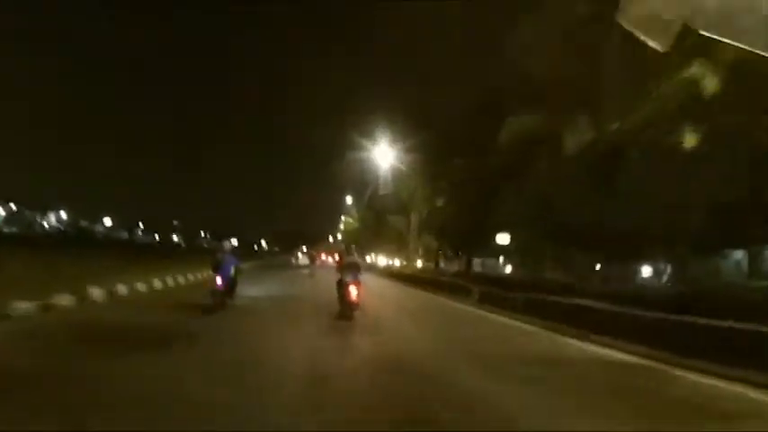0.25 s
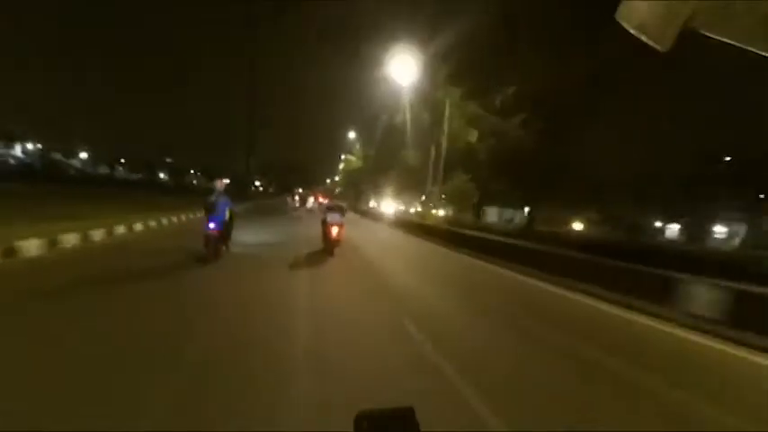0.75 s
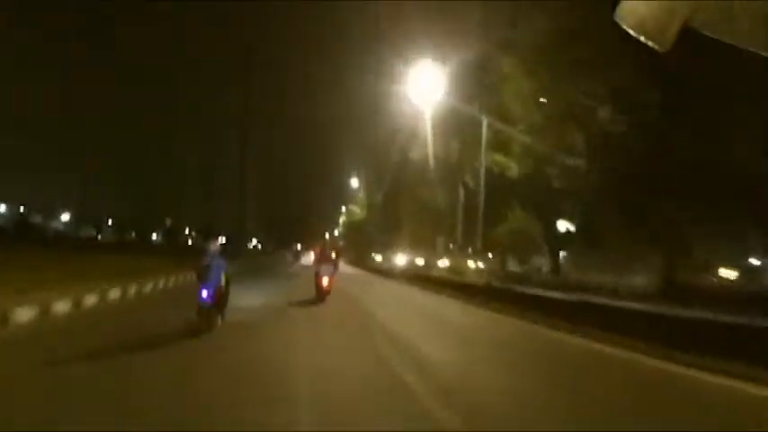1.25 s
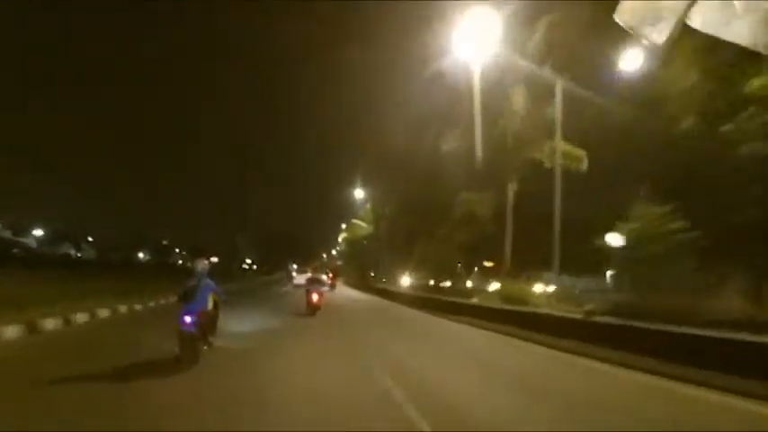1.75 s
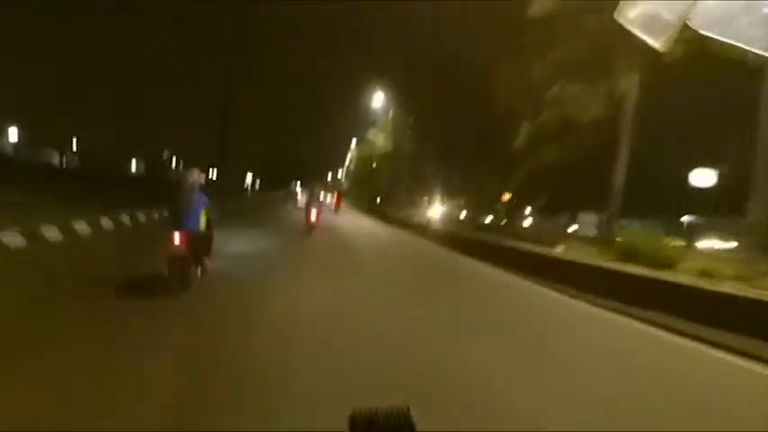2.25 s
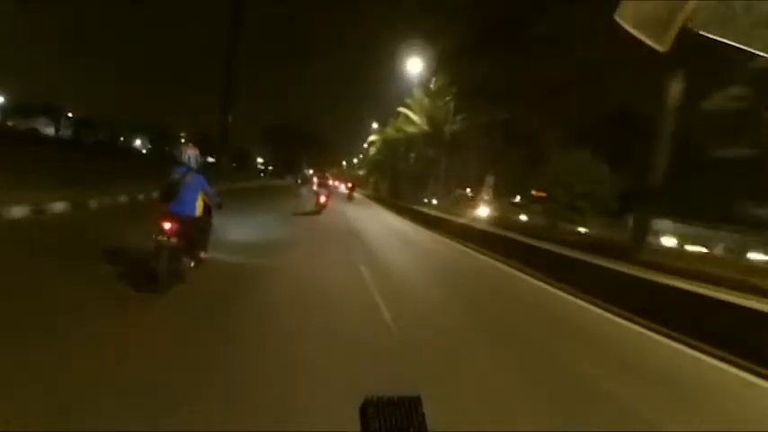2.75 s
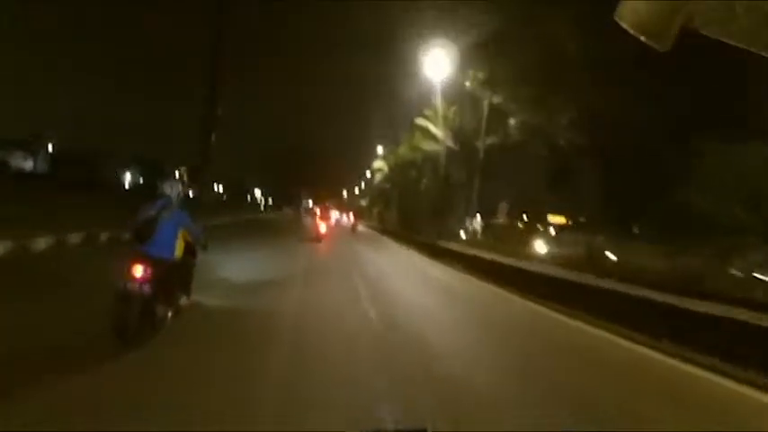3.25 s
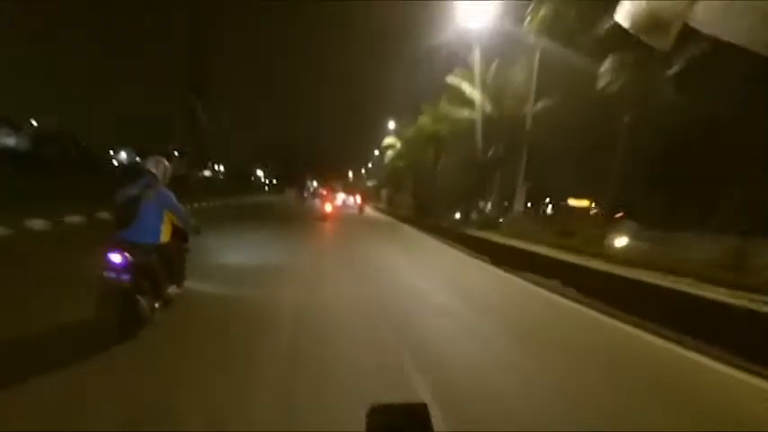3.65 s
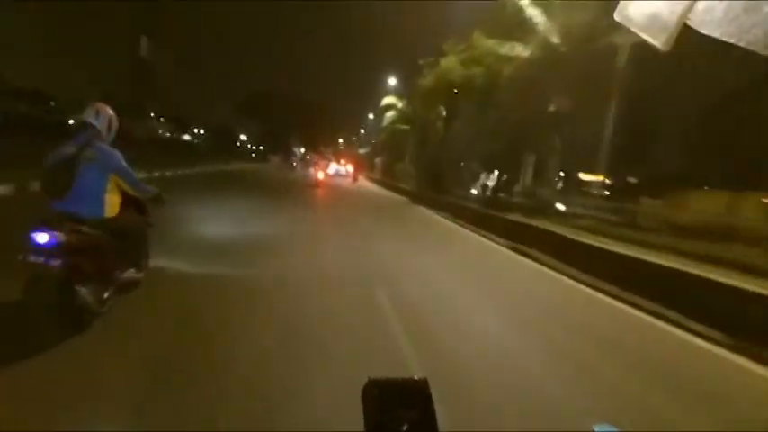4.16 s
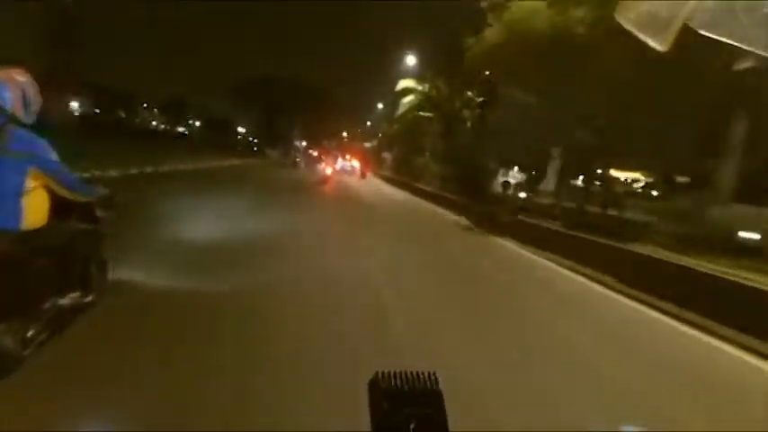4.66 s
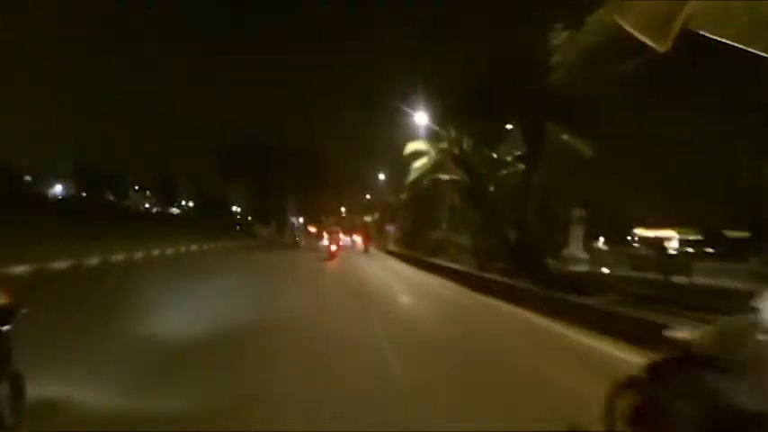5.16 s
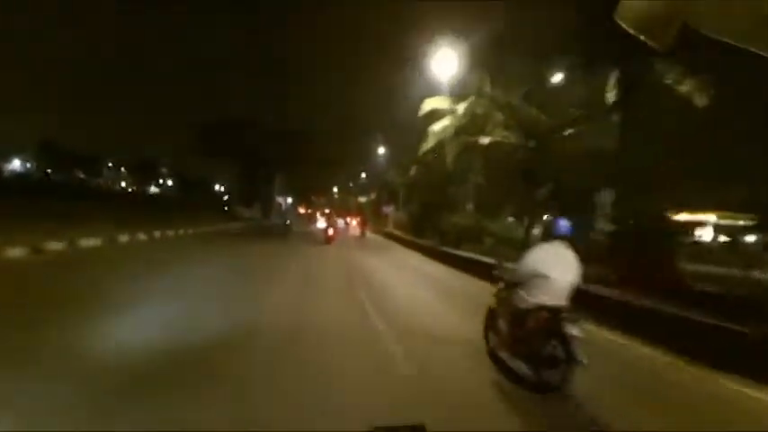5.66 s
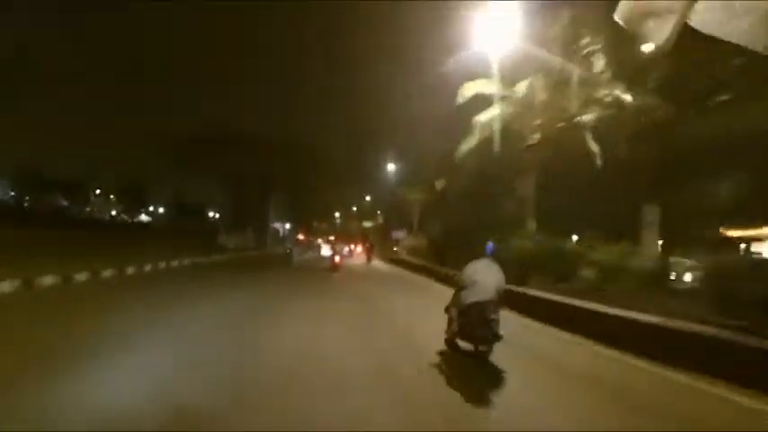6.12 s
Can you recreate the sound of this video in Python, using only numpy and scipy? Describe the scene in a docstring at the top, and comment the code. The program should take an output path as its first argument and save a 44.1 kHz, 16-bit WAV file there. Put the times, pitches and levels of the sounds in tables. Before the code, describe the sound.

Strong wind buffets a microphone on a motorcycle cruising along a city road, making a deep rumble with irregular thumps and fluttering. Underneath, the small engine drones and putters at a steady speed, with faint gear whine and tyre hiss. Light metallic ticking comes through in the second half. Near five seconds two scooters run close alongside, and the road noise swells and brightens a little.

```python
"""Wind buffets the microphone in heavy lumps: a small single-cylinder motorcycle cruising a city at night.
Big eddies thump the diaphragm and shed smaller ones that flutter and tear. Underneath, each firing puffs
through the silencer as a drone and putter, the valves tick, the gears whine and the tyres hiss on asphalt.
Near five seconds two scooters run close alongside, and the road noise swells and brightens."""
import sys
import numpy as np
from scipy import signal
from scipy.fft import rfft, irfft, next_fast_len
from scipy.io import wavfile
from scipy.ndimage import uniform_filter1d, map_coordinates

SR = 44100
rng = np.random.default_rng(int(sys.argv[2]) if len(sys.argv) > 2 else 0)


def unload_audio(sound):
    """Save the sound as a 16-bit wav file, at the path given as the first command line argument."""
    columns = np.transpose(np.atleast_2d(sound))
    # keep every value between -1 and 1, then stretch to whole-number steps
    steps = np.round(np.clip(columns, -1, 1) * 32767)
    wavfile.write(sys.argv[1], SR, steps.astype(np.int16))


N = 281799

# The bed of wind. Each row: time in seconds, then base levels of rumble, eddies and tearing in dB.
AIRFLOW_LEVELS = [(0, -25.5, -35.5, -43.5), (0.5, -29, -33, -41.5), (1.0, -25.5, -33, -42.5),
                  (1.6, -25.5, -36.5, -45.5), (1.9, -22.5, -30.5, -42.5), (2.45, -24.5, -30.5, -42.5),
                  (3.0, -23.5, -29, -43), (3.65, -20, -30.5, -44), (4.04, -21.5, -25.5, -50),
                  (4.3, -23.5, -29, -50), (4.5, -14.5, -24, -45), (4.8, -22.5, -27, -53),
                  (5.12, -24.5, -30, -58), (5.3, -24, -30, -50), (5.9, -21.5, -32, -48),
                  (6.39, -21, -31.5, -42.5)]
# Gust hits. Each row: centre and half-length in seconds, then thump, eddies and tearing in dB.
GUST_HITS = [(0.055, 0.02, -24, -39, -45), (0.227, 0.017, -13, -37, -41),
             (0.273, 0.037, -12.5, -25.5, -34.5), (0.368, 0.018, -21.5, -34, -36),
             (0.71, 0.024, -13.5, -25, -43), (0.784, 0.016, -25, -44, -39), (0.898, 0.01, -17.5, -30, -54),
             (1.04, 0.02, -28, -34, -36), (1.212, 0.0079, -31, -24, -60), (1.422, 0.037, -21, -48, -44),
             (1.75, 0.036, -24.5, -42, -57), (1.928, 0.036, -19, -33, -55),
             (2.043, 0.023, -14, -27.5, -39.5), (2.231, 0.024, -10, -24, -37),
             (2.61, 0.029, -21.5, -45, -55), (2.707, 0.017, -8.5, -31, -33), (2.898, 0.02, -16.5, -34, -46),
             (3.044, 0.026, -19.5, -30, -43), (3.22, 0.014, -26, -35, -55), (3.393, 0.02, -25, -35, -59),
             (3.452, 0.014, -17, -20.5, -52), (3.493, 0.022, -13.5, -33, -56),
             (3.663, 0.013, -10, -43, -40), (3.782, 0.011, -20, -34, -57), (3.866, 0.026, -19.5, -35, -52),
             (3.941, 0.019, -8.5, -22, -43), (3.993, 0.016, -12.5, -21, -30), (4.121, 0.025, -12, -34, -54),
             (4.159, 0.015, -26, -22.5, -40), (4.567, 0.024, -27, -37, -38), (4.624, 0.013, -15, -34, -49),
             (4.693, 0.017, -17.5, -24, -52), (4.995, 0.02, -16.5, -26, -54),
             (5.444, 0.012, -14.5, -26, -48), (5.545, 0.0095, -11, -42, -55),
             (5.73, 0.018, -19.5, -30.5, -47), (5.96, 0.017, -17, -27, -42), (6.051, 0.016, -12, -31, -53),
             (6.079, 0.023, -19, -25, -34), (6.262, 0.015, -14, -30.5, -43),
             (6.377, 0.026, -22, -41, -35.5)]
# The airflow slackens. Each row: centre and half-length in seconds, drop of the rumble in dB.
WIND_LULLS = [(0.13, 0.037, 0.5), (0.97, 0.012, 6), (1.996, .014, 14), (2.305, 0.018, 4), (2.53, 0.018, 3),
              (2.425, 0.024, 6), (2.665, 0.018, 8), (2.826, .025, 4), (3.298, 0.016, 6), (3.6, 0.03, 7),
              (3.73, 0.017, 6.5), (4.21, 0.014, 4), (4.388, 0.02, 4), (5.16, 0.05, 10.5),
              (5.667, 0.033, 4.5), (5.862, 0.025, 12.5), (6.166, 0.024, 7)]
# Wind colours, deepest first. Each row: frequency in Hz, relative level in dB.
SWAY_EQ = [(3, -17), (9, -4.5), (15, 2.5), (20, -7.5), (30, -20.5), (100, -69.5), (1000, -120)]
RUMBLE_EQ = [(8, -28.5), (17, -3), (23, 0), (33, -1.5), (48, -6.5), (70, -8.5), (100, -13), (150, -27),
             (260, -35.5), (500, -84), (3000, -120)]
THUMP_EQ = [(10, -17), (22, -1), (35, 1.5), (55, -3), (75, -8), (100, -20), (150, -27.5), (260, -39.5),
            (500, -78), (3000, -120)]
EDDY_EQ = [(50, -28.5), (100, 2.5), (150, 1), (210, -3), (290, -11), (390, -19), (600, -27.5), (900, -36.5),
           (1300, -37.5), (2500, -51.5), (6000, -54.5), (14000, -110)]
TEAR_EQ = [(120, -16.5), (250, 8), (340, 6.5), (500, -3.5), (800, -11.5), (1600, -28), (3000, -64),
           (12000, -106)]

# Engine speed. Each row: time in seconds, firings per second.
FIRING_RATE = [(0.0, 43.92), (1.2, 44.17), (2.2, 44.22), (4.0, 44.69), (5.0, 44.8), (6.39, 44.68)]
# Engine faders. Each row: time in seconds, then drone, putter (before its trim) and valve ticks in dB.
ENGINE_LEVELS = [(0, -41, -49, -74), (1, -44, -46, -75), (2, -42, -47, -68), (3.65, -37.5, -45.5, -59),
                 (4.4, -38, -44.5, -59.5), (5.1, -37, -38, -53.5), (5.6, -38.5, -35.8, -54.5),
                 (5.8, -39.5, -37, -58), (6, -40.5, -40, -61), (6.39, -44.5, -44, -63)]
# Low exhaust harmonics. Each row: multiple of the firing rate, relative level in dB.
DRONE_HARMONICS = [(3, 3), (4, -7.5), (5, 2), (6, 1.5), (7, 0), (8, -9)]
# The exhaust pipe's mellow voice and its sharp bark. Each row: frequency in Hz, relative level in dB.
MELLOW_EQ = [(150, -50.5), (350, -3), (400, -7.5), (445, 1), (490, 2.5), (540, 4.5), (585, 3.5),
             (630, -1.5), (680, -2.5), (730, -13.5), (810, -34), (900, -14), (1200, -36), (3000, -34),
             (12000, -103)]
BARK_EQ = [(150, -22), (380, -38.5), (490, 2), (580, 3.5), (630, 2.5), (680, 5.5), (730, 2), (810, -11.5),
           (900, -12), (1200, -13), (1700, -24), (3000, -22), (12000, -105)]
# Crossfade between those voices. Each row: time in seconds, share of bark from 0 to 1.
BARK_BLEND = [(0, 0.1), (4.2, 0.05), (4.9, 0.45), (5.5, 0.29), (6, 0.76), (6.39, 0.7)]
# Colour of the valve ticks. Each row: frequency in Hz, relative level in dB.
TICK_EQ = [(2500, -30), (4500, -6), (5000, -6), (5700, -6), (6400, -6.5), (7600, -3.5), (8500, -6.5),
           (11000, -11.5), (15000, -34)]
# Metallic rasp after each tick. Each row: time in seconds, level in dB, ring pitch in Hz.
VALVE_RASP = [(0, -78, 6400), (2.3, -80, 6550), (2.9, -60, 7070), (3.6, -65, 7180), (3.85, -61, 6450),
              (4.35, -59, 6400), (4.7, -65, 6540), (5.1, -63, 7770), (5.6, -62, 7300), (6.39, -66, 7200)]
# Harder valve strikes. Each row: start in seconds, peak in dB before the trim, ring pitch in Hz.
VALVE_CLACKS = [(3.1757, -42, 6190), (3.3329, -41, 7670), (3.4905, -39, 7220), (3.5349, -41, 7240),
                (3.58, -39, 6800), (3.6247, -34, 7000), (3.6695, -41, 7200), (3.7145, -37, 6840),
                (3.849, -39, 6700), (4.0278, -37, 6550), (4.0505, -39, 6700), (4.162, -36, 6600),
                (4.6758, -37, 7880), (5.0108, -32, 7580), (5.0555, -33, 7100), (5.1004, -31, 7610),
                (5.1223, -31, 8100), (5.2556, -36, 7110), (5.3243, -32, 7600), (5.368, -35, 7200)]

# Passing scooters. Each row: time alongside in seconds, speed relative to the rider in m/s,
# side gap in metres, then base levels of tyre roar, belt sizzle and casing rattle in dB.
SCOOTER_PASSES = [(4.65, -1.97, 1.23, -50.5, -61, -47), (4.95, 5.5, 2.26, -56.5, -47.5, -45)]
# Scooter colours; the beam is the finest belt sizzle. Each row: frequency in Hz, relative level in dB.
ROAR_EQ = [(400, -20), (1100, 3), (1600, -2), (3000, -7), (4200, -7.5), (5200, -4.5), (7000, -14),
           (14000, -46)]
SIZZLE_EQ = [(2500, -46), (4200, -25), (5100, -4), (6300, 0.5), (7800, 3.5), (10000, -4), (12000, -10),
             (15000, -20)]
BEAM_EQ = [(4000, -30), (7000, -8), (9000, 3), (11000, -2), (13000, -7), (15000, -12)]
RATTLE_EQ = [(4000, -33), (5900, -19), (6400, -5), (6850, -18), (7300, -3), (7900, -5), (10000, -28)]

# Drive train and tyre faders. Each row: time in seconds, then whirr and hiss in dB before their trims.
ROAD_LEVELS = [(0, -49.5, -52.5), (1.7, -50.5, -53), (3.2, -50.5, -52), (4.3, -48.5, -53.5),
               (5.1, -46.5, -51), (6.39, -48, -54)]
# Colours of the whirr and the hiss. Each row: frequency in Hz, relative level in dB.
WHIRR_EQ = [(300, -19.5), (600, 6.5), (950, 4.5), (1200, -2.5), (1650, -1), (1950, -2), (2150, -3),
            (2680, -2.5), (2850, -9.5), (3080, -9), (3350, -6.5), (3800, -9.5), (4100, -11), (6000, -21),
            (12000, -55)]
HISS_EQ = [(2000, -16), (3500, -16), (4450, -5.5), (5000, 1.5), (5600, 0.5), (5950, 1.5), (6150, 3.5),
           (6700, 2), (7400, 3), (8500, 1.5), (10000, -3.5), (12000, -12), (15000, -19.5)]
# The note of the meshing teeth. Each row: time in seconds, level in dB, pitch in Hz.
GEAR_WHINE = [(0, -59, 1850), (1, -63, 1835), (1.5, -72, 1822), (3, -67, 1815), (4.05, -64, 1810),
              (4.6, -62, 1820), (5.1, -60, 1850), (5.45, -61, 1840), (5.75, -65, 1820), (6.39, -64, 1812)]
# Gear case resonances. Each row: frequency in Hz, width in Hz, relative level in dB.
CASING_MODES = [(1877, 270, 6), (2700, 140, -1), (3365, 70, 3.5), (3730, 350, 1)]
# Fader for the ringing gear case. Each row: time in seconds, level in dB.
CASING_FADER = [(0, -59.5), (1.2, -60.5), (2.2, -61), (4, -65), (6.39, -72)]
# Colour of the dry scuff. Each row: frequency in Hz, relative level in dB.
SCUFF_EQ = [(700, -20), (1200, -1), (1600, 1), (2000, -5), (3000, -16), (8000, -50)]


def wind():
    """Big eddies thump the diaphragm; each pressure swing sheds a burst of smaller ones."""
    rumble_db, eddy_db, tear_db = curves(AIRFLOW_LEVELS)
    thump_power, eddy_power, tear_power = [gust_power(db) for db in np.transpose(GUST_HITS)[2:]]
    lull_db = sum(drop * bell(s, half) for s, half, drop in WIND_LULLS)
    rumble_gain = amp(rumble_db + 0.89 * wobble(13) - lull_db)
    thumps = np.sqrt(thump_power) * steadied(noise(THUMP_EQ), seconds=0.037)
    swing_db = 1.8 * wobble(14) - 0.48 * lull_db
    eddy_gain = np.sqrt(amp(eddy_db + swing_db) ** 2 + eddy_power)
    tear_gain = np.sqrt(amp(tear_db + swing_db) ** 2 + tear_power)
    # the largest eddies are too slow to follow single thumps
    sway_gain = amp(-1) * uniform_filter1d(np.sqrt(rumble_gain ** 2 + thump_power), size=SR // 8)
    sway = sway_gain * steadied(noise(SWAY_EQ), seconds=0.31)
    lumps = steadied(noise(RUMBLE_EQ), seconds=0.087)
    shedding = unit(1 + 0.45 * np.abs(lumps)) * amp(1.7 * wobble(60))
    eddies = eddy_gain * steadied(noise(EDDY_EQ) * shedding, seconds=0.14)
    tearing = tear_gain * steadied(noise(TEAR_EQ) * shedding, seconds=0.069)
    return sway + thumps + rumble_gain * lumps + eddies + tearing


def gust_power(levels_db):
    """Summed power of the gusts, each swelling and fading at its own level."""
    return sum(amp(db) ** 2 * bell(s, half) for (s, half, *_), db in zip(GUST_HITS, levels_db))


def engine():
    """One cylinder keeps the exhaust and the valves on the same beat."""
    firing_hz, = curves(FIRING_RATE)
    drone_db, putter_db, tick_db = curves(ENGINE_LEVELS)
    cycles = np.cumsum(firing_hz) / SR
    return exhaust(cycles, drone_db, putter_db) + valves(cycles, tick_db)


def exhaust(cycles, drone_db, putter_db, putter_trim_db=-2.5):
    """Each firing puffs through the silencer: a low drone under a putter that sharpens to a bark."""
    drone = unit(sum(amp(db + 2.55 * wobble(2.99)) * np.sin(2 * np.pi * (k * cycles + rng.random()))
                     for k, db in DRONE_HARMONICS))
    puffs = strokes(cycles, at=0.34, scatter_db=1.1, jitter_s=0.00005)
    bark, = curves(BARK_BLEND)
    putter = unit((1 - bark) * colour(puffs, MELLOW_EQ) + bark * colour(puffs, BARK_EQ))
    return amp(drone_db) * drone + amp(putter_db + putter_trim_db) * putter


def valves(cycles, tick_db, click_t60_s=0.0051, ring_t60_s=0.032, rasp_t60_s=0.05):
    """A valve clicks on its seat, leaving a faint ring in the cylinder head and a metallic rasp."""
    age = np.arange(SR // 50) / SR
    tick_decay = amp(-60 * age / click_t60_s) + amp(-8 - 60 * age / ring_t60_s)
    seatings = strokes(cycles, at=0.37, scatter_db=2.2, jitter_s=0.00018)
    tick_envelope = signal.fftconvolve(seatings, tick_decay)[:N]
    ticks = colour(tick_envelope * rng.standard_normal(N), TICK_EQ)
    rasp_db, rasp_hz = curves(VALVE_RASP)
    rasp_envelope = signal.fftconvolve(seatings, amp(-60 * age / rasp_t60_s))[:N]
    rasp = unit(rasp_envelope * narrow_noise(rasp_hz, width_hz=400))
    return amp(tick_db) * ticks + amp(rasp_db) * rasp


def clacks(width_hz=1100, rise_s=0.0012, trim_db=0.5):
    """Now and then the valve gear strikes harder and rings briefly."""
    age, sound = np.arange(SR // 50) / SR, np.zeros(N)
    lowpass = signal.butter(N=2, Wn=width_hz / 2, fs=SR, output="sos")
    grit = signal.sosfilt(lowpass, rng.standard_normal((2, N)))
    for s, db, hz in VALVE_CLACKS:
        span = slice(int(s * SR), int(s * SR) + len(age))
        phase = 2 * np.pi * hz * age
        ring = grit[0, span] * np.cos(phase) + grit[1, span] * np.sin(phase)
        burst = age * np.exp(-age / rise_s) * ring
        sound[span] += amp(db + trim_db) * burst / np.abs(burst).max()
    return sound


def scooters(roar_falloff=1.7, shield_db=25, beam_trim_db=-6, beam_narrowness=7.4):
    """Tyres roar as they near; belts sizzle to the side and rear, casings rattle to the rear."""
    t, sound = np.arange(N) / SR, np.zeros(N)
    for s, speed, gap, roar_db, sizzle_db, rattle_db in SCOOTER_PASSES:
        ahead = speed * (t - s)
        distance = np.hypot(gap, ahead)
        near = gap / distance
        rear, front = np.maximum(ahead / distance, 0), np.maximum(-ahead / distance, 0)
        roar = amp(roar_db) * near ** roar_falloff * noise(ROAR_EQ)
        shadow_db = shield_db * front ** 2  # the body hides the belt from the front
        sizzle = amp(sizzle_db - shadow_db + 0.87 * wobble(30)) * near * noise(SIZZLE_EQ)
        rattle = amp(rattle_db + 1.8 * wobble(180)) * (near * rear) ** 2 * noise(RATTLE_EQ)
        side_beam = amp(sizzle_db + beam_trim_db) * near ** beam_narrowness * noise(BEAM_EQ)
        sound += roar + sizzle + side_beam + rattle
    return sound


def road(whirr_trim_db=0.6, hiss_trim_db=-1.5):
    """The drive train whirrs in its casing and the tyres hiss on grainy asphalt."""
    whirr_db, hiss_db = curves(ROAD_LEVELS)
    whirr = amp(whirr_db + whirr_trim_db + 0.59 * wobble(40)) * noise(WHIRR_EQ)
    hiss = amp(hiss_db + hiss_trim_db + 0.75 * wobble(70)) * noise(HISS_EQ)
    return whirr + hiss


def gears():
    """Meshing teeth whine on one wavering note and keep a few resonances of the casing singing."""
    whine_db, whine_hz = curves(GEAR_WHINE)
    casing_db, = curves(CASING_FADER)
    f = np.fft.rfftfreq(N, 1 / SR)
    # each resonance acts twice, so its skirts are steep
    response = sum(amp(db) * (f * width / (hz ** 2 - f ** 2 + 1j * f * width)) ** 2
                   for hz, width, db in CASING_MODES)
    casing = unit(irfft(rfft(rng.standard_normal(N)) * response, N))
    return amp(whine_db) * narrow_noise(whine_hz, width_hz=60) + amp(casing_db) * casing


def scuff(centre_s=3.465, sigma_s=0.019, level_db=-47.5):
    """Something brushes once near the microphone, short and dry."""
    return amp(level_db) * bell(centre_s, np.sqrt(2) * sigma_s) * noise(SCUFF_EQ)


def amp(db):
    """Decibels to gain."""
    return 10 ** (np.asarray(db) / 20)


def unit(x):
    """Scale to rms 1."""
    return x / np.sqrt(np.mean(x ** 2) + 1e-20)


def curves(rows):
    """Automation lanes: one value per sample for each column after the time."""
    times, *columns = np.transpose(rows)
    return [np.interp(np.arange(N) / SR, times, column) for column in columns]


def bell(centre_s, half_s):
    """A bell-shaped swell, down to 1/e at half_s either side of its peak."""
    return np.exp(-((np.arange(N) / SR - centre_s) / half_s) ** 2)


def wobble(rate):
    """A smooth random curve, rate knots a second."""
    knots = rng.standard_normal(int(N * rate / SR) + 4)
    return map_coordinates(knots, [np.arange(N) * rate / SR])


def colour(x, eq):
    """Pass x through a causal filter shaped like the EQ curve; the result has rms 1."""
    size = 2 * next_fast_len(N // 2 + SR // 2)
    hz, db = np.transpose(eq)
    gain_db = np.interp(np.log(np.fft.rfftfreq(size, 1 / SR) + 1), np.log(hz + 1), db)
    cepstrum = irfft(np.log(amp(gain_db)))[:size // 2]
    cepstrum[1:] *= 2  # minimum phase: the ring follows the hit
    response = np.exp(rfft(cepstrum, size))
    return unit(irfft(rfft(x, size) * response)[:N])


def noise(eq):
    """Coloured noise of rms 1."""
    return colour(rng.standard_normal(N), eq)


def narrow_noise(centre_hz, width_hz):
    """A narrow band of noise of rms 1 whose centre glides along a curve."""
    f = np.fft.fftfreq(N, 1 / SR)
    white = rng.standard_normal(N) + 1j * rng.standard_normal(N)
    slow = np.fft.ifft(np.fft.fft(white) / np.sqrt(1 + (2 * f / width_hz) ** 4))
    carrier = np.exp(2j * np.pi * np.cumsum(centre_hz) / SR)
    return unit((slow * carrier).real)


def steadied(x, seconds):
    """Even out the slow swells of a noise and keep its fast lumps."""
    window = signal.windows.hann(int(seconds * SR))
    power = signal.fftconvolve(x ** 2, window / window.sum(), "same")
    return x / np.sqrt(np.abs(power) + 1e-6)


def strokes(cycles, at, scatter_db, jitter_s):
    """One impulse per engine cycle, at the given fraction of it, uneven in size and timing."""
    starts = np.flatnonzero(np.diff(np.floor(cycles - at)))
    size, late = rng.standard_normal((len(starts), 2)).T
    where = np.clip(starts + late * jitter_s * SR, 0, N - 1).astype(int)
    return np.bincount(where, amp(scatter_db * np.clip(size, -2, 1)), N)


def scene():
    """Wind on top, machines and road beneath; one microphone feeds both channels."""
    sound = wind() + engine() + clacks() + gears() + road() + scooters() + scuff()
    return np.array([sound, sound])


def record(dry):
    """Fade both ends so they do not click, and cut the very top of the treble."""
    fade_s, top_hz = 0.008, 15250
    size = next_fast_len(N + SR // 2)
    t = np.arange(N) / SR
    ramp = np.clip(np.minimum(t, t[-1] - t) / fade_s, 0, 1)
    fade = np.sin(np.pi / 2 * ramp) ** 2
    passband = np.fft.rfftfreq(size, 1 / SR) < top_hz
    return irfft(rfft(dry * fade, size) * passband, size)[:, :N]


dry = scene()
out = record(dry)
unload_audio(out)
```